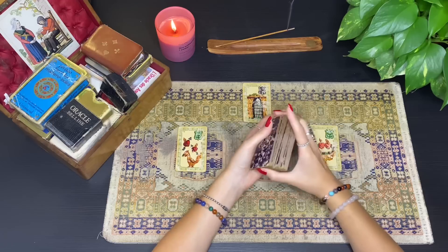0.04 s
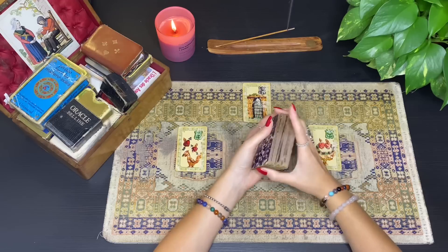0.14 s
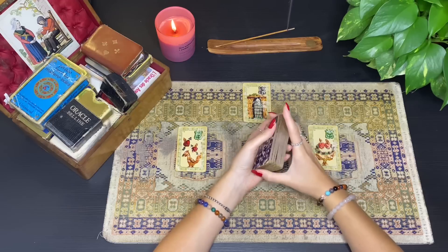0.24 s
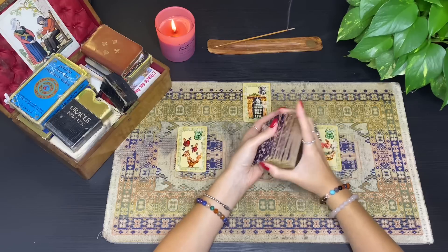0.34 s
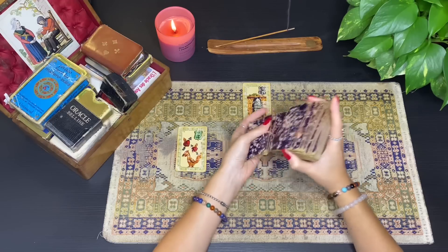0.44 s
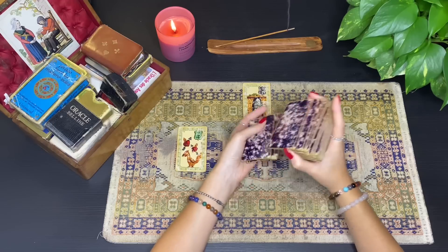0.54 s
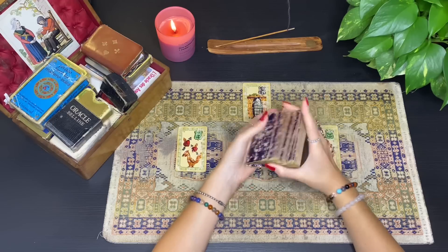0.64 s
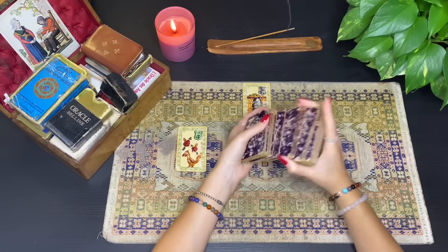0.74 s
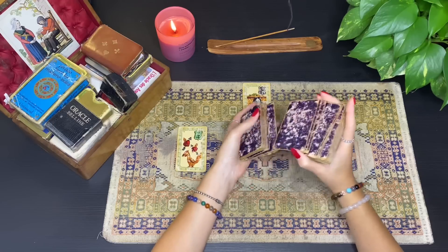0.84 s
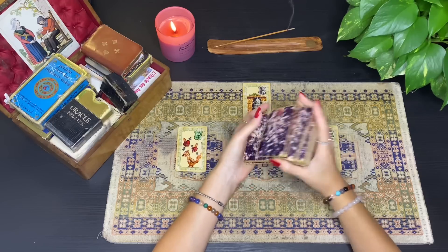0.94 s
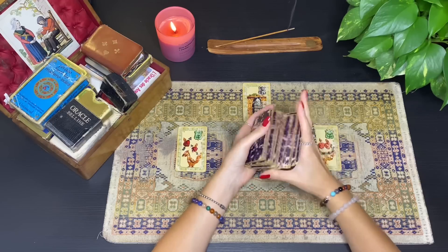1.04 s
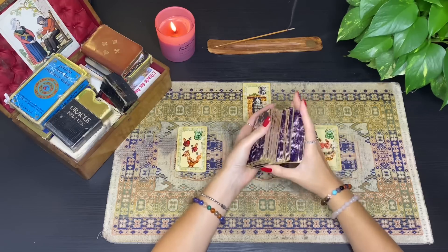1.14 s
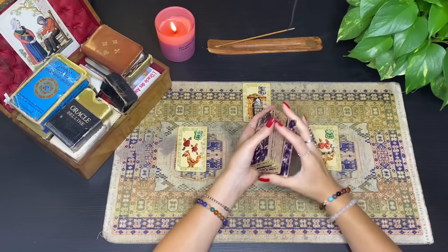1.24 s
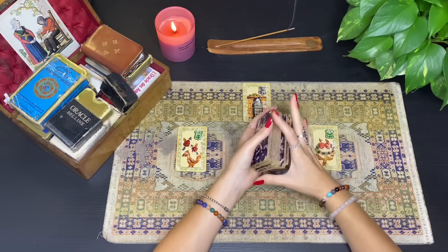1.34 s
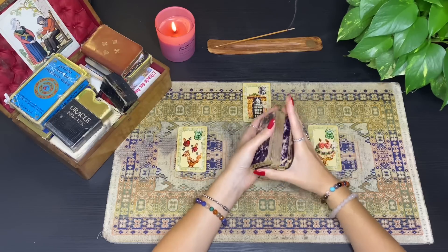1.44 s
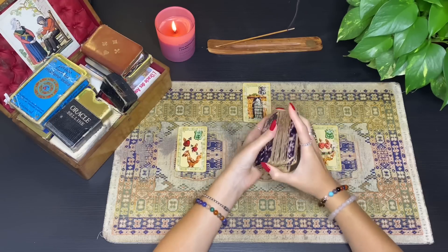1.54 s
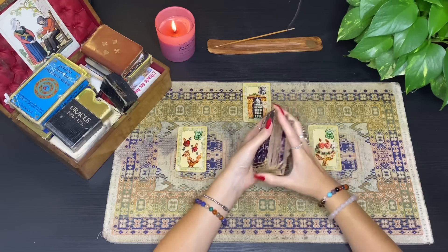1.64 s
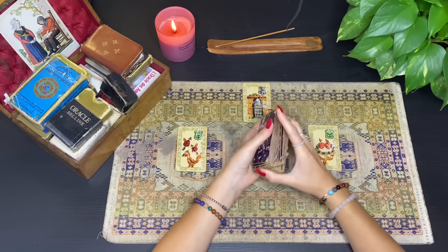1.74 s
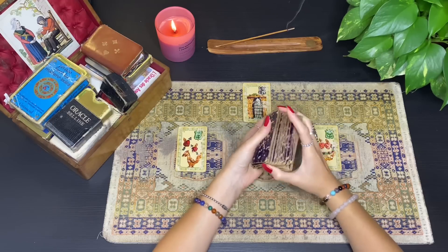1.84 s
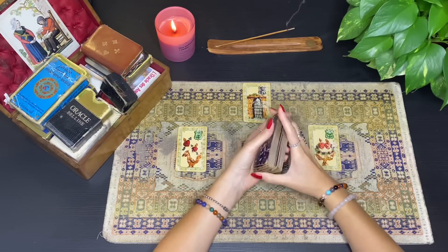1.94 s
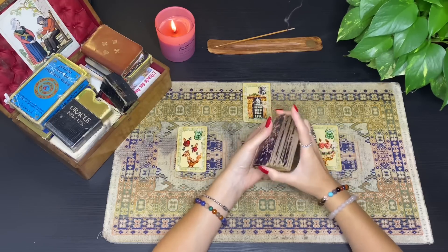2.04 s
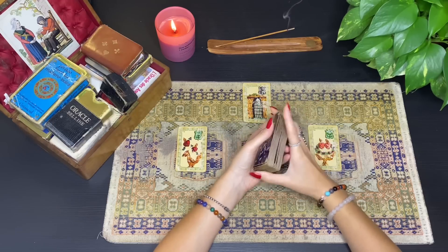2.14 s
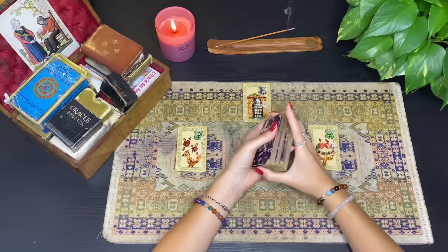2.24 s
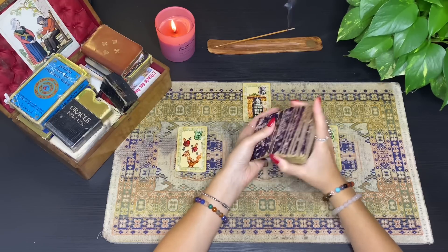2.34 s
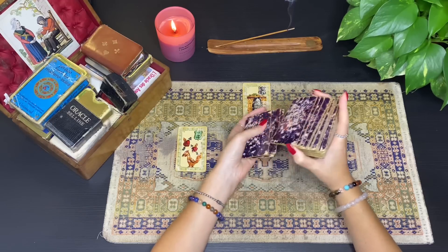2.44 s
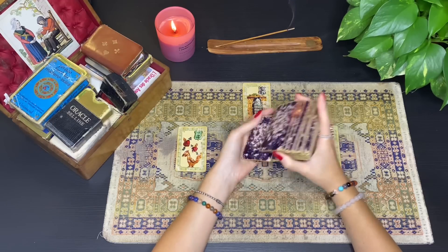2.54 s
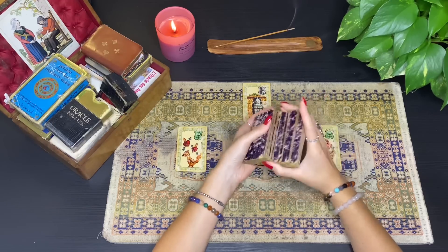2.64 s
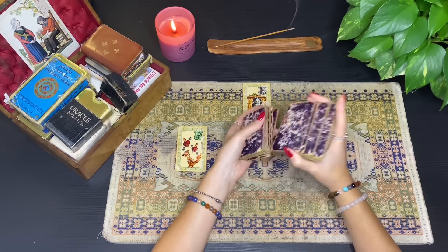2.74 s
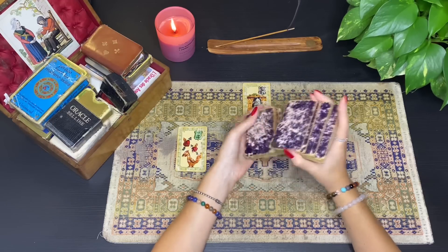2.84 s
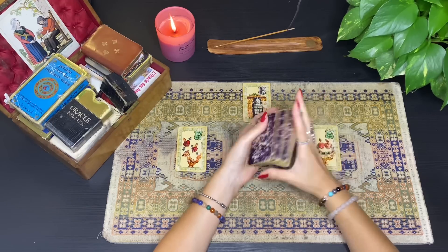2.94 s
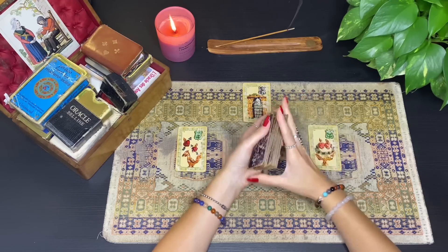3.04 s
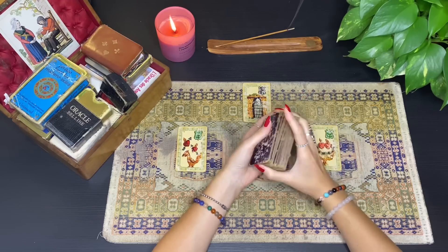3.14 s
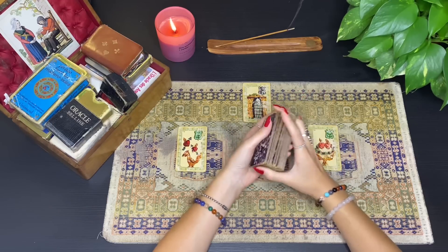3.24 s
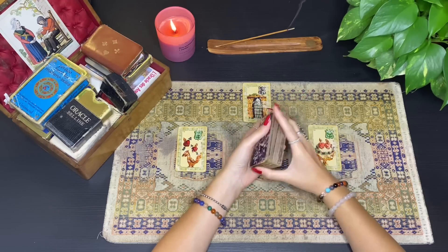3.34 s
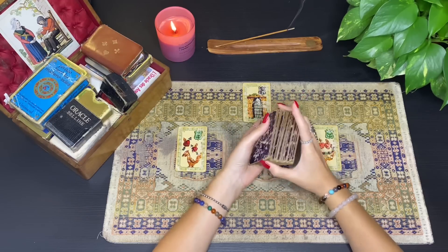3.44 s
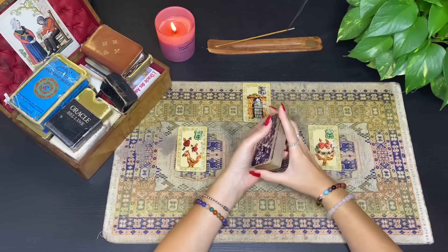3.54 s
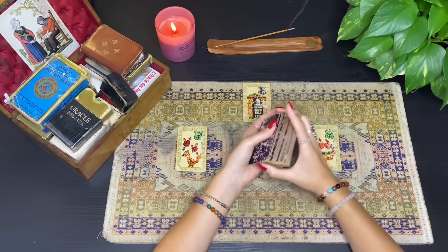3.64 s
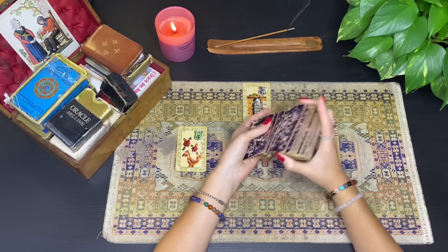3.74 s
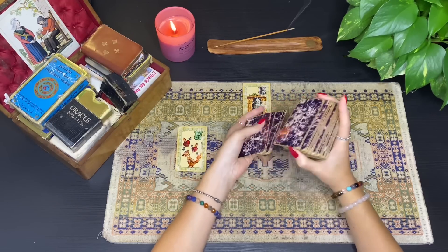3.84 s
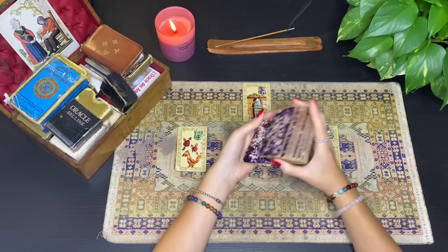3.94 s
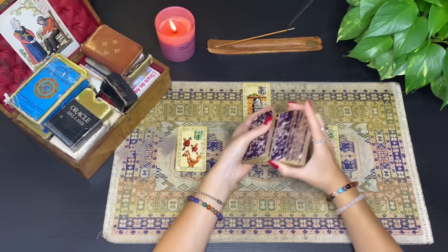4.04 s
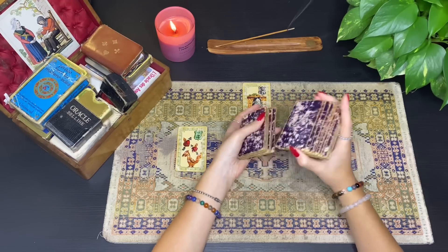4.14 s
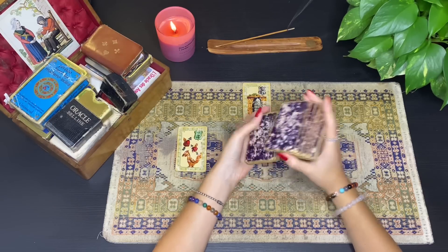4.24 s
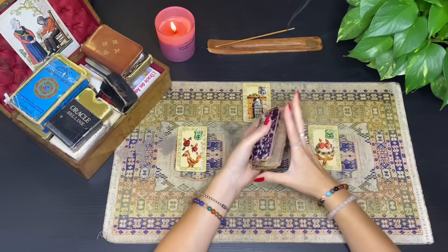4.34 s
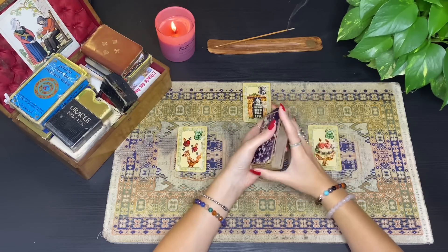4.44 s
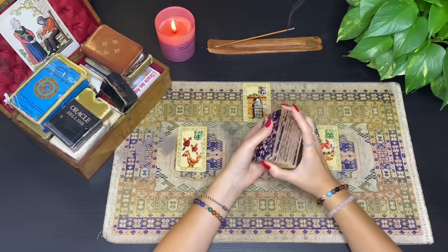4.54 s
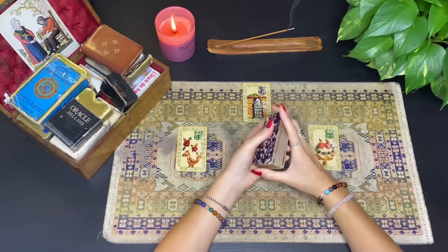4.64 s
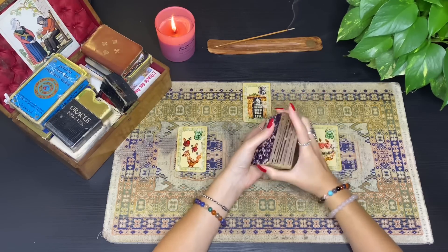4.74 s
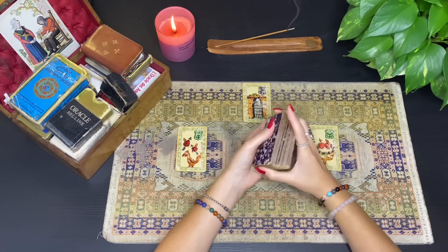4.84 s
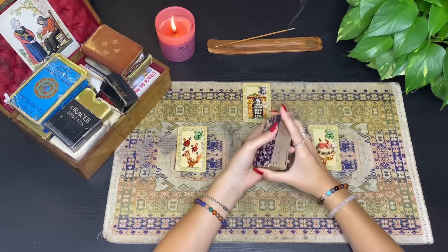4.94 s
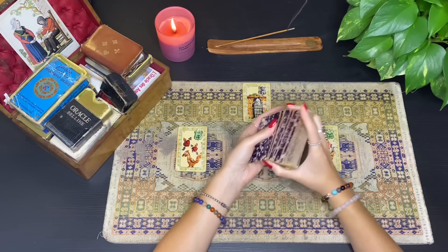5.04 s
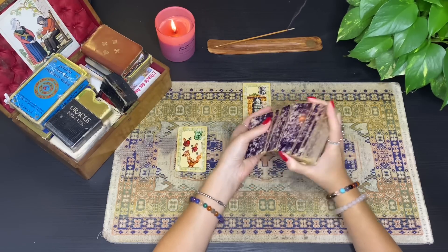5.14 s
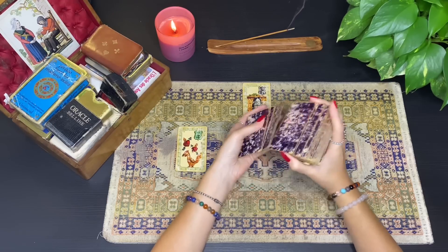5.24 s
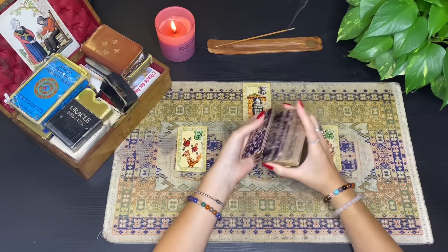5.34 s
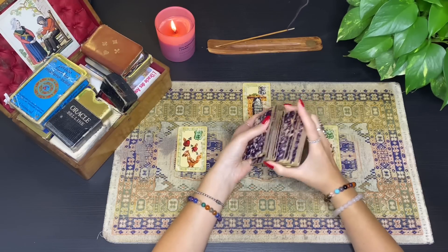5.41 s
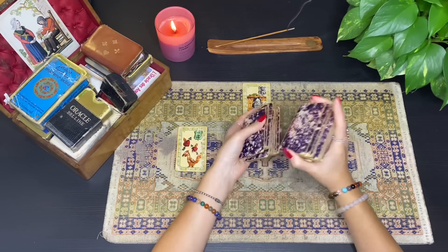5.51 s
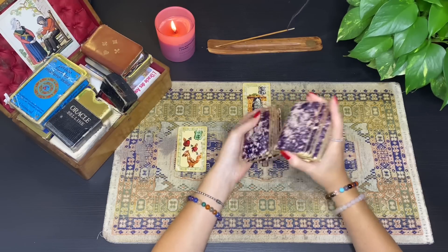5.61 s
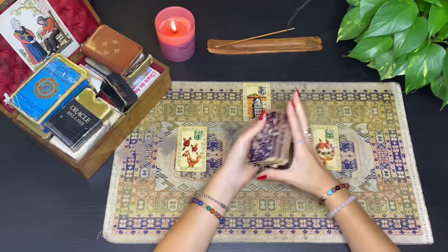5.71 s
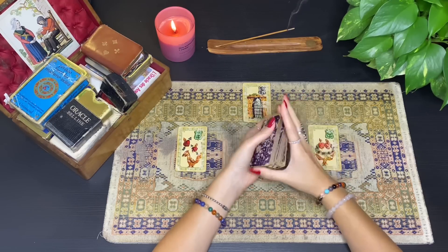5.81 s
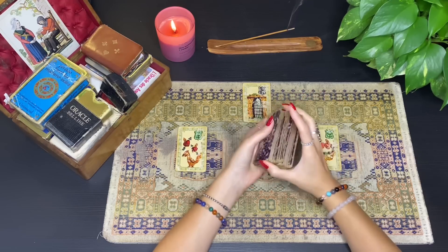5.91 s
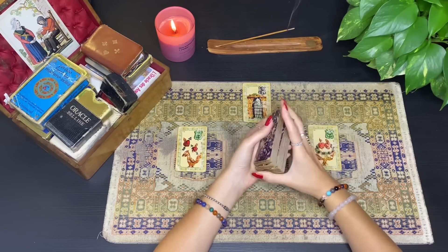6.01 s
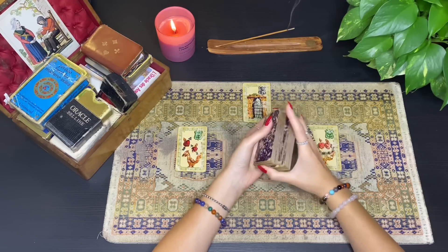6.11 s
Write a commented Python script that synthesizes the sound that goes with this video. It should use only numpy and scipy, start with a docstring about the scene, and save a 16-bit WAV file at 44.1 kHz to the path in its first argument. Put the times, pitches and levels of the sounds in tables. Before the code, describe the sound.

Close in a small room, two hands shuffle a stiff deck of cards. Packets slide with short grainy rustles, then knock together in dry ticks, little clatters and a few sharp snaps. Bursts come irregularly, separated by quieter moments of faint ticking, where a low ventilation hum shows through. The stereo sound is close and crisp, with a brief room reflection.

```python
"""Overhand card shuffle in a small room

Two hands shuffle a deck of stiff cards overhand above a cloth, under a phone in a small room. Packets slap and
tick edge on edge: short scrapes and clatters drive the damped modes of the deck. Sliding faces rustle as grainy
coloured noise, decaying diffuse noise is the walls' brief answer, and ventilation is shaped noise with resonant
hums. The recorder's stereo processing turns one side against the other."""
import sys
import numpy as np
from scipy import signal
from scipy.fft import rfft, irfft, next_fast_len
from scipy.io import wavfile
from scipy.ndimage import uniform_filter1d

SR = 44100
rng = np.random.default_rng(int(sys.argv[2]) if len(sys.argv) > 2 else 0)


def wav_out(sig):
    """Save sig, one row per channel (or a flat mono array), as 16-bit PCM at SR to the path in sys.argv[1]."""
    wavfile.write(sys.argv[1], SR, np.round(np.clip(np.atleast_2d(sig).T, -1, 1) * 32767).astype(np.int16))


N = 272225  # samples in the scene


def undb(db):
    """Decibel definition: an amplitude ratio is 10 to the power dB / 20."""
    return 10 ** (np.asarray(db) / 20)


def level(x, db):
    """Root-mean-square scaling: bring x to db if its RMS is to be measured against 1."""
    return x * undb(db) / np.sqrt(np.mean(x ** 2))


def along(table, size):
    """Logarithmic pitch axis: read a (Hz, value) table at every bin of a spectrum."""
    hz, value = np.transpose(table)
    bins_hz = np.arange(size // 2 + 1) * SR / size
    return np.interp(np.log(bins_hz + 1), np.log(hz + 1), value)


def shape(x, gain):
    """Linear filtering: multiply the spectrum by gain(size)."""
    size = next_fast_len(x.shape[-1])
    return irfft(rfft(x, size) * gain(size), size)[..., :x.shape[-1]]


def colour(x, table):
    """Spectral colouring: filter x by a table of frequency in Hz and gain in dB."""
    return shape(x, lambda size: undb(along(table, size)))


def diffuse(count):
    """Diffuse-field coherence: mid and side noise in proportions that set left-right likeness by band."""
    # Likeness of the two sides. Each row: frequency in Hz, correlation from 0 to 1.
    likeness = [(100, 1), (300, 0.88), (700, 0), (1700, 0.33), (2600, 0.4), (5000, 0.33), (7000, 1),
                (16000, 0.83)]
    mid, side = rng.standard_normal((2, count))
    mid = shape(mid, lambda size: np.sqrt((1 + np.clip(along(likeness, size), 0, 1)) / 2))
    side = shape(side, lambda size: np.sqrt((1 - np.clip(along(likeness, size), 0, 1)) / 2))
    return np.array([mid + side, mid - side])


def ring(x, hz, t60):
    """Damped resonance: one mode, falling 60 dB in t60 s; a unit blow peaks near 1 if decay is slow."""
    pole = np.exp(2j * np.pi * hz / SR - np.log(1000) / (t60 * SR))
    return signal.lfilter([1], [1, -pole], x).imag


def walk(rate):
    """Random modulation: levels held 1 / rate s, slewed between, with an RMS of 1."""
    held = int(SR / rate)
    steps = np.repeat(rng.standard_normal(N // held + 1), held)
    return level(uniform_filter1d(steps, held)[:N], 0)


def ventilation():
    """Broadband flow noise with narrowband resonance: rumble, hiss and fan tones wavering in strength."""
    # Spectrum of the moving air. Each row: frequency in Hz, relative level in dB.
    air_colour = [(25, -35), (33, -31), (45, -3.5), (63, -2.5), (85, -1.5), (105, -2.5), (160, -9.5),
                  (205, -19), (290, -12.5), (500, -27), (1300, -38), (2300, -47), (2800, -46),
                  (3500, -53.5), (12000, -51), (16000, -60.5)]
    # Fan tones. Each row: frequency in Hz, nominal width in Hz, RMS level in dB.
    fan_tones = [(63.73, 8.3, -53), (123.73, 7.1, -53.5), (282.4, 18, -68)]
    hum = 0
    for hz, width, db in fan_tones:
        t60 = 2.0 / width
        tone = ring(ring(rng.standard_normal(N), hz, t60), hz, t60)
        hum = hum + level(tone, db)
    air = level(colour(diffuse(N), air_colour), -48.5)  # dB
    return air + hum


def room(x):
    """Reverberation: convolve with diffuse noise that dies away, mostly faster in the treble."""
    # Decay of the walls' answer. Each row: band centre in Hz, t60 in seconds, level in dB.
    walls = [(516, 0.55, 2.5), (1280, 0.47, -6.5), (2250, 0.5, 0), (2824, 0.54, -9), (3470, 0.38, 0),
             (5500, 0.46, -3), (11000, 0.29, -5)]
    t = np.arange(SR // 2) / SR
    field, answer = diffuse(len(t)), 0
    onset = 1 - np.exp(-(t / 0.00071) ** 2)
    for k, (_, t60, db) in enumerate(walls):
        # neighbouring bands cross-fade
        band = [(hz, float(j == k)) for j, (hz, _, _) in enumerate(walls)]
        fade = onset * np.exp(-np.log(1000) * t / t60)
        fade = fade / np.sqrt(np.sum(fade ** 2))
        answer = answer + undb(db) * shape(field, lambda size: along(band, size)) * fade
    return signal.fftconvolve(x[None], answer, axes=1)[:, :N]


def slide():
    """Stick-slip friction: varnished faces catch and slip along the deck as grainy noise in three colours."""
    # Packets drawn off or slipping home. Each row: time of fastest sliding in seconds,
    # rustle level in dB, build-up in seconds, treble in dB against the rustle.
    strokes = [(.02, -70.5, 0.14, -7), (.19, -74, 0.1, -12), (0.401, -59.5, 0.12, 0),
               (.47, -52.5, 0.071, -14), (.7, -47.5, 0.098, -10.5), (.84, -57, .1, -8),
               (.92, -60.5, .06, -4), (1.07, -57.5, 0.094, -4), (1.201, -61, 0.064, -4.5),
               (1.5, -63.5, 0.13, -2), (1.7, -64.5, 0.11, -6), (1.92, -70, 0.088, 0),
               (2.22, -70.5, 0.29, -9), (2.36, -58, 0.14, -2), (2.43, -51, .06, -7), (2.68, -56, 0.071, -5),
               (2.86, -59, 0.097, -14.5), (3., -54.5, 0.048, -4), (3.09, -63, 0.041, -2),
               (3.3, -63, 0.065, -7), (3.57, -68, 0.1, -11), (3.72, -60, 0.16, -3), (3.79, -47, 0.074, -13),
               (3.97, -61, 0.087, -10.5), (4.08, -54.5, 0.12, -9.5), (4.38, -55, 0.093, -9),
               (4.66, -72, .1, -4), (4.88, -68, 0.053, -12), (5.07, -61.5, 0.13, -1.5),
               (5.16, -57.5, 0.095, -9), (5.25, -76, .1, -6), (5.389, -55, 0.12, -4.5),
               (5.55, -69, .08, -5), (5.78, -60, 0.071, -8), (6.02, -75, 0.081, 2.5)]
    # Colours of the low, papery and top layers. Each row: frequency in Hz, relative level in dB.
    rustle = [(300, 2), (900, -5.5), (2000, -8), (2750, 2), (3500, -6.5), (5000, -13), (16000, -66.5)]
    paper = [(2500, -58.5), (4000, 0.5), (5500, -1.5), (7000, 0.5), (9000, -64)]
    sizzle = [(5000, -34.5), (7500, 1), (12000, -4.5), (16000, -44)]
    build_db, fade_db_per_s = 20, 212  # a stroke builds through this range, then dies away
    paper_db, paper_share = -4, .4  # the papery band takes this share of the treble setting

    peak_s, db, build_s, treble_db = np.transpose(strokes)[:, :, None]
    t = np.arange(0, N / SR + .01, .002)
    since = t - peak_s
    stroke_db = db + np.minimum(build_db * since / build_s, -fade_db_per_s * since)
    grain = undb(4 * walk(400) + 2 * walk(80))
    layers = [(0, rustle), (paper_db + paper_share * treble_db, paper), (treble_db, sizzle)]
    total = 0
    for over_db, table in layers:
        # overlapping strokes add in power
        swell = np.linalg.norm(undb(stroke_db + over_db), axis=0)
        noise = level(colour(grain * diffuse(N), table), 0)
        total = total + np.interp(np.arange(N) / SR, t, swell) * noise
    return total


def taps():
    """Modal excitation by impact: tick, scrape and clatter drive each deck mode as the contact's colour sets."""
    # Card contacts. Each row: start in seconds, snap drive in dB, then thud, knock and treble drive
    # in dB against the snap, and clatter in dB against the blow.
    contacts = [(0.1584, -64, 3.5, -10, -12, 2), (0.178, -53, -2, -3.5, -9.5, -22),
                (0.4151, -31, -22, -11.5, -11, -2), (0.4299, -31, -14, -17, -17, -1),
                (0.4667, -30.5, -7.5, -22, -20, -30), (0.591, -47.5, -17, -26, -14, -8),
                (0.6488, -13, -42.5, -17.5, -26, -18), (0.664, -24, -19, -22, -23.5, -19),
                (0.723, -39.5, -25, -25, -9, -10), (0.6824, -41, -12, -29, -4.5, -7),
                (0.8277, -53.5, -0.5, 1, -10, -13.5), (0.885, -40, -21, -12, -11.5, -1.5),
                (0.9196, -38.5, -32, -24, -23, -8), (0.9414, -43, -26, -12, -20, -3),
                (0.9984, -29.5, -14, -12, -17, -4), (1.0112, -33, -11, -13, -9.5, -18),
                (1.0177, -31, -35, -8.5, -9.5, -25), (1.1763, -61.5, 13.5, 1.5, -33, -10),
                (1.2979, -57, -0.5, -20, -7, 2), (1.3182, -36.5, -46, -13, -19.5, -13),
                (1.3917, -60.5, -4, -20, 0.5, -5), (1.626, -69, -8, -5, 7.5, -6),
                (1.6627, -56, -16, -4, -4, 0), (1.6707, -43.5, -23, -16, -12, -14),
                (1.9014, -55, -5.5, -6.5, -14.5, 2.5), (1.9192, -50, -9, -6, -18.5, -7.5),
                (2.1475, -48.5, -17, -1.5, -10.5, -6), (2.1576, -57, -6, 2, -11, -2.5),
                (2.371, -22, -27.5, -17.5, -17, -7.5), (2.4366, -31, -19, -16, -21, -19),
                (2.5966, -42.5, -16, -11, -15, -13), (2.605, -32.5, -21.5, -16, -21, 6.5),
                (2.6198, -17.5, -27, -20.5, -20, -24), (2.6366, -30, -19, -12, -28, -14),
                (2.6414, -29.5, -17.5, -13.5, -26, -9), (2.75, -40.5, -12.5, -20, -16.5, -11),
                (2.849, -50, -18, -10, -24, 3.5), (2.8913, -49, -17, -4, -22, -14),
                (2.947, -27, -16, -7, -16, -20), (2.9643, -32, -36, -3.5, -11, -9.5),
                (3.27, -66, 3.5, -23.5, -9, 2.5), (3.2903, -54, -9, 3, -10, -11),
                (3.515, -58, -4, 5, -3.5, -2), (3.7395, -18, -22, -15, -18, 0),
                (3.747, -16.5, -27, -18, -18, -32), (3.9383, -39, -26, -17, -6.5, -24),
                (3.9773, -37.5, -16, -16, -22, 3), (3.9972, -27.5, -22.5, -16, -19.5, -3.5),
                (4.0301, -39, -8, -0.5, -16, -14), (4.0596, -45.5, -8, -19, -11, -5),
                (4.0954, -41.5, -18, -10, -19, -6), (4.314, -31.5, -17.5, -8.5, -14, -3),
                (4.339, -42, -8, -22, -7.5, -3), (4.635, -61.5, -9, -4, -11, 5),
                (4.893, -53, -11, -4, -14.5, -13), (5.0838, -40, -42, -26, -17, -6),
                (5.1287, -39.5, -12.5, -15, -8, -19), (5.191, -44.5, -17, -14, -18, -8),
                (5.2335, -44, -20, -17, -16, -17), (5.2618, -47.5, -17, -20, -22, -14),
                (5.3179, -44, -10, -23, -8, 3), (5.3803, -34.5, -16, -15, -14, -10),
                (5.401, -37, -18, -13, -19, -8), (5.5104, -40.5, -22, -17, -11, -11.5),
                (5.632, -57, -15, -14, -23, -17), (5.7073, -30.5, -18.5, -15, -15.5, -1.5),
                (5.7437, -26, -23, -9.5, -15, -20), (5.755, -28.5, -22, -15, -35, -22)]
    # Centres in Hz of thud, knock, snap, treble and sizzle.
    drive_hz = [750, 1700, 2900, 5500, 10000]
    # Modes of the deck. Each row: frequency in Hz, t60 in seconds, gain in dB.
    deck = [(618, 0.0086, 10), (1005, 0.0073, 11.5), (1245, 0.0088, 11), (1657, 0.0033, 13),
            (2768, 0.0081, 3), (3064, 0.007, 1), (3643, 0.0032, 5.5), (4410, 0.0047, 4.5),
            (5430, 0.0018, 17.5), (8500, 0.00078, 25), (10850, 0.0014, 20), (13830, 0.00083, 16)]
    scrape_s, settle_s = 0.0011, 0.022  # loose cards clatter on after a contact
    lands_s, landing = .0018, 1.2  # sharp landing of the edge: delay, size against the scrape
    sharper_db_per_db = 0.25  # harder contacts land more sharply
    sizzle_under_treble_db = 3.5

    t = np.arange(4096) / SR
    chance = rng.standard_normal((len(contacts), 2, len(t)))
    modes_hz = np.array(deck)[:, 0]
    # how each mode's energy response is spread over frequency
    reach = np.array([np.abs(rfft(ring(1. * (t == 0), hz, t60))) ** 2 for hz, t60, _ in deck])
    reach /= reach.sum(axis=1, keepdims=True)
    drive = np.zeros((len(deck), 2, N + 2 * len(t)))
    for (s, snap_db, thud, knock, treble, settle_db), (noise, size) in zip(contacts, chance):
        # single cards let go one after another, in uneven sizes
        flicks = noise * undb(4.3 * np.repeat(size[:len(t) // 32], 32))
        scrape = flicks * t ** 2 * np.exp(-t / scrape_s)
        settle = flicks * t * np.exp(-2 * t / settle_s)
        blow = scrape / np.linalg.norm(scrape)
        # the edge lands just after the first touch
        blow[int(lands_s * SR)] += landing * undb(sharper_db_per_db * (snap_db + 28))
        # each mode takes the same energy from the blow, however the flicks fall
        blow = blow / np.sqrt(reach @ np.abs(rfft(blow)) ** 2)[:, None]
        push = blow + undb(settle_db) * settle / np.linalg.norm(settle)
        over_snap_db = [thud, knock, 0, treble, treble - sizzle_under_treble_db]
        mode_db = snap_db + np.interp(np.log(modes_hz), np.log(drive_hz), over_snap_db)
        # where along the deck it lands can shift the arrival on one side by a sample
        side_lag = int(np.clip(np.round(0.55 * noise[-1]), -1, 1))
        for side, lag in enumerate((0, side_lag)):
            start = int(s * SR) + lag
            drive[:, side, start:start + len(t)] += undb(mode_db)[:, None] * push
    total = 0
    for k, (hz, t60, db) in enumerate(deck):
        total = total + (-1) ** k * undb(db) * ring(drive[k, :, :N], hz, t60)  # signs alternate
    return total


def scene():
    """Superposition: cards, the walls' answer to their left side, and ventilation add."""
    cards = taps() + slide()
    return cards + room(cards[0]) + ventilation()


def record(dry):
    """Interchannel phase and level difference: the recorder turns and tilts left against right; the top is cut."""
    # Phase that the recorder sets between the sides. Each row: frequency in Hz, lead of left over right in
    # radians.
    turn = [(0, 0), (400, 0), (1300, .4), (3200, 1.1), (5000, .3), (7000, 3), (8100, 3.3), (9900, 6.2),
            (11500, 6.4), (12800, 9.3), (14300, 9.5), (15800, 12.5)]
    # Level between the sides. Each row: frequency in Hz, left minus right in dB.
    tilt = [(200, -0.5), (1300, 1), (2700, -1.5), (4400, 0), (16000, 0)]
    # Top of the microphone response, on both sides. Each row: frequency in Hz, gain in dB.
    top = [(15000, 2.5), (15600, 14), (15900, -18.5), (17000, -27)]
    sides = np.array([[.5], [-.5]])  # each side takes half of every difference

    def response(size):
        """Complex frequency response: gain and phase of each side."""
        gain_db = sides * along(tilt, size) + along(top, size)
        return np.exp(1j * sides * along(turn, size)) * undb(gain_db)

    # order 8, ripple .2 dB, stopband 70 dB down, edge in Hz
    low_pass = signal.ellip(8, .2, 70, 16900, fs=SR, output="sos")
    return signal.sosfilt(low_pass, shape(dry, response))


dry = scene()
out = record(dry)
wav_out(out)
```